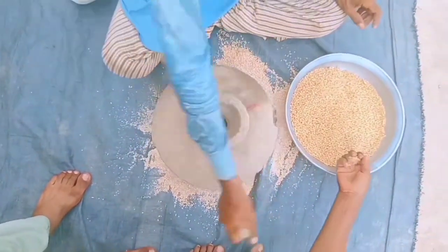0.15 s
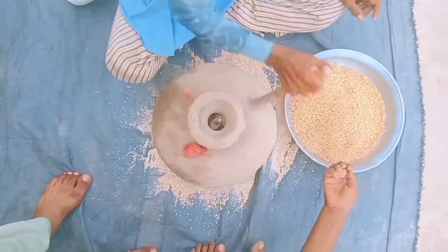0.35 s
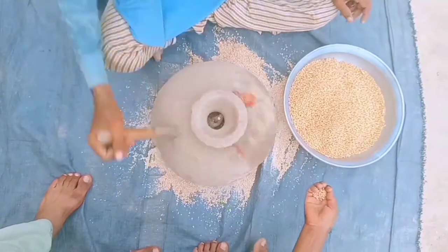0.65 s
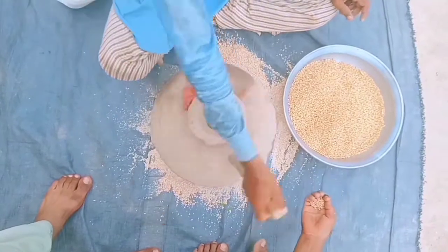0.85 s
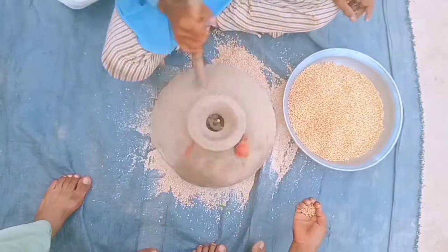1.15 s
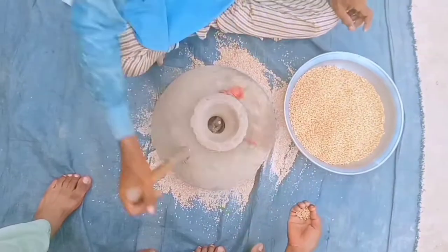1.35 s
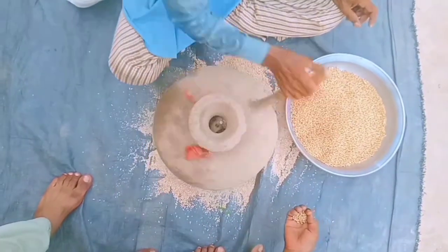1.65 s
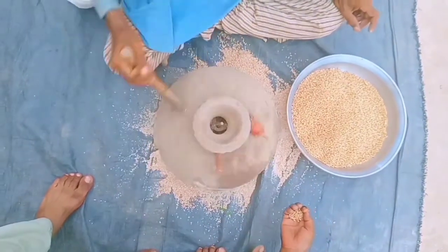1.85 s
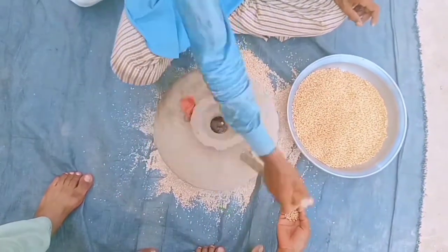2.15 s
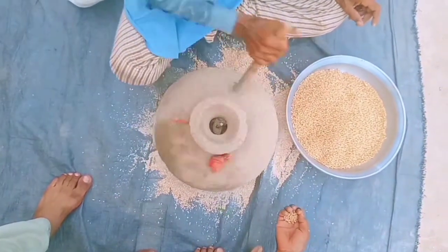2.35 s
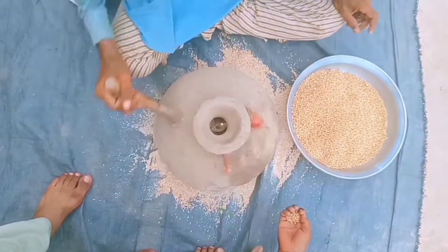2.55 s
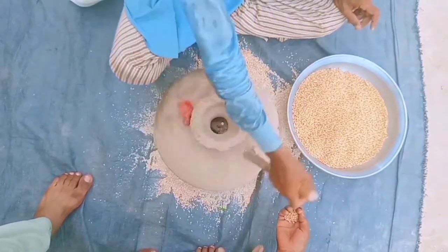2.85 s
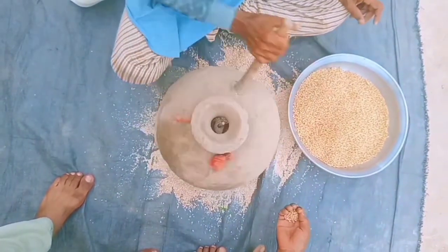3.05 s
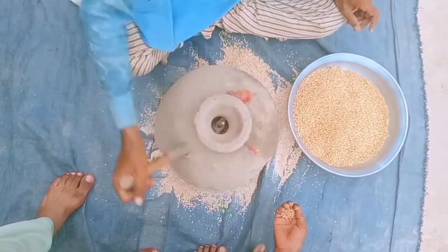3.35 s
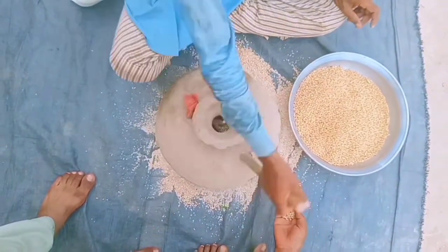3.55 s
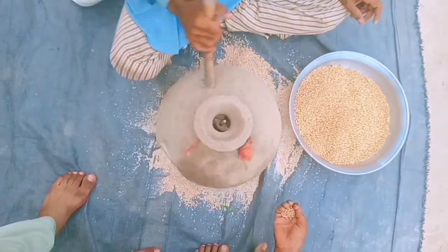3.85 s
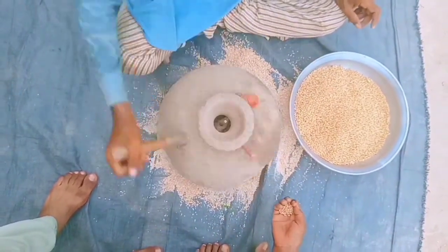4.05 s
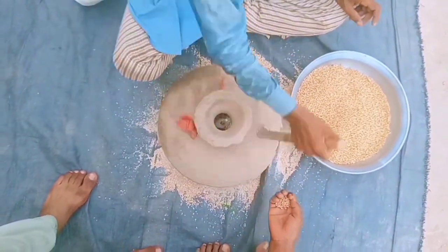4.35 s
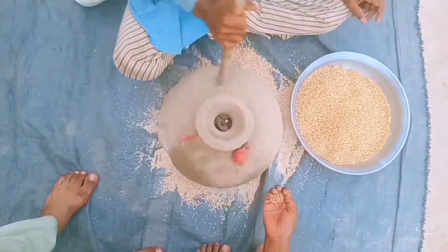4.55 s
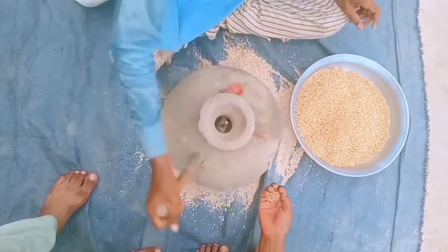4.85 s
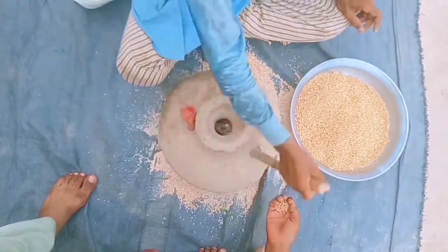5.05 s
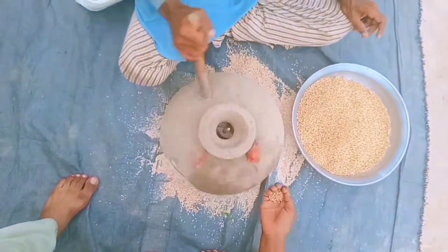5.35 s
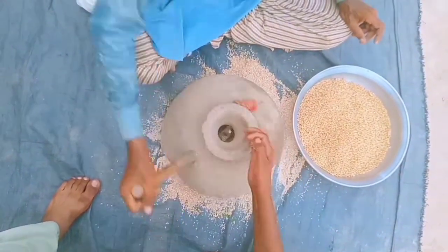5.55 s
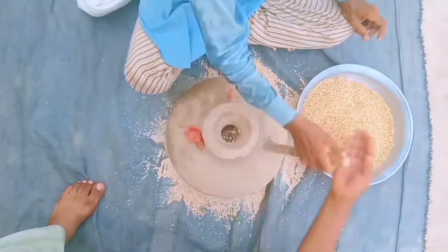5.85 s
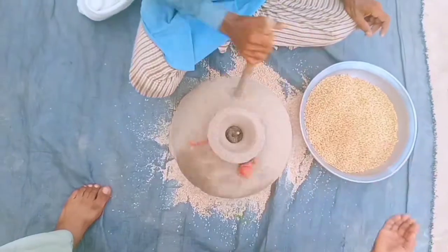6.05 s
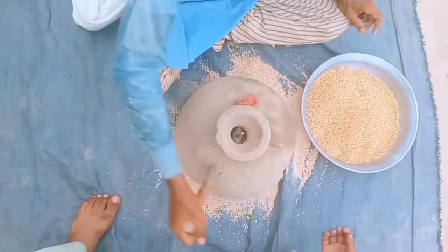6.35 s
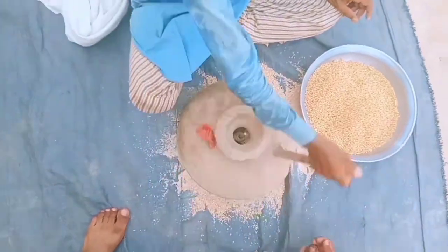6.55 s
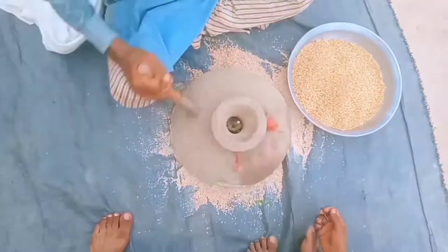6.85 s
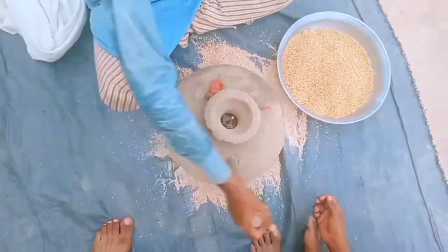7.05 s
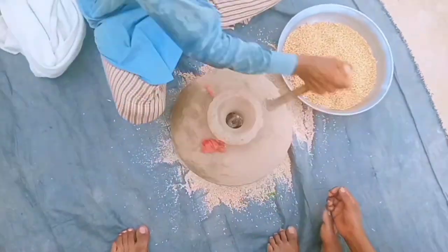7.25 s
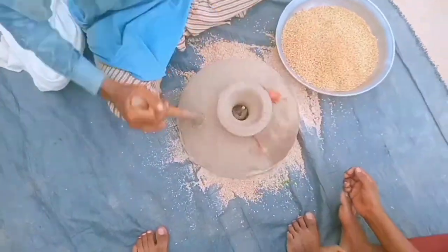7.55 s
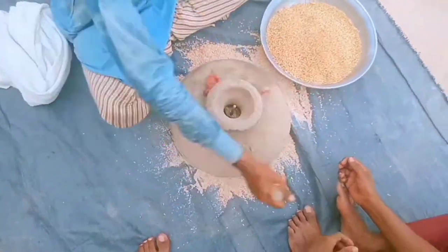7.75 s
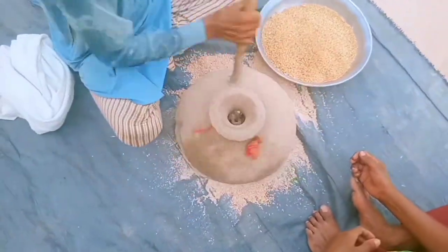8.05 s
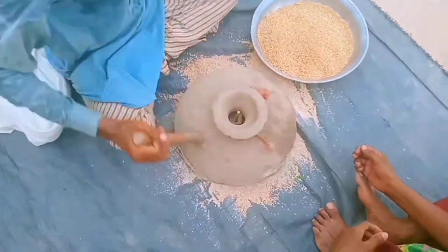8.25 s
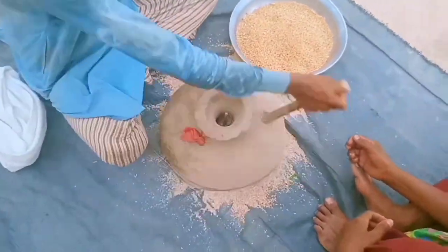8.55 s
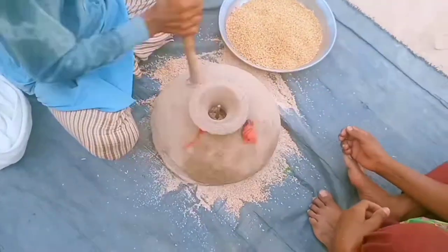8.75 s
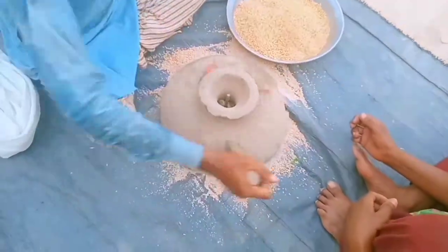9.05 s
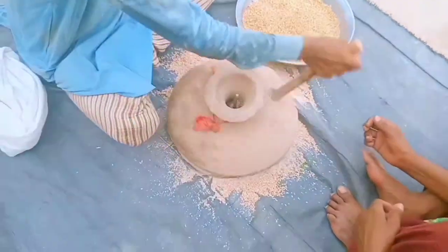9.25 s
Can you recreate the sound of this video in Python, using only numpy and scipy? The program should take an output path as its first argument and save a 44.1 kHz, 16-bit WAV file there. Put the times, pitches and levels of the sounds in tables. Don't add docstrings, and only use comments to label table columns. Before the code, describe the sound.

Steady gritty stone-on-stone grinding with a ringing hum and low rumble, broken by sharp kernel snaps, quick crunchy runs and one tiny squeak.

```python
import sys
import numpy as np
from scipy import signal
from scipy.io import wavfile

SR = 44100
rng = np.random.default_rng(int(sys.argv[2]) if len(sys.argv) > 2 else 0)


def volts_from_db(level):
    exponent = np.asarray(level, float) / 20
    return 10 ** exponent


def generate_wav(sig):
    pcm = np.round(np.clip(np.atleast_2d(sig).T, -1, 1) * 32767).astype(np.int16)
    wavfile.write(sys.argv[1], SR, pcm)


N = 414981

# (time [s], turns made [turns])
TURNS = [(0, 0.01), (2.57, 4.01), (4.0, 6.01), (6.25, 9.01), (8.22, 12.01), (9.41, 13.8)]
# (time [s], level [dB])
PRESSURE = [(0.05, -30.5), (0.68, -30), (1.3, -30.5), (1.74, -31), (2.52, -30.5), (2.99, -33),
            (3.85, -32.5), (5.06, -32), (5.89, -33), (6.52, -33), (7.04, -32.5), (7.29, -31.5), (7.45, -33),
            (8.31, -34), (8.58, -32.5), (9.41, -34)]
# (time [s], level [dB])
ROCKING = [(0.0, -35), (0.76, -39), (1.7, -36), (2.96, -41), (3.85, -39.5), (4.56, -42.5), (5.01, -37),
           (5.5, -42.5), (9.41, -41.5)]
# (time [s], share [0-1])
MEAL_LOAD = [(0, 0.1), (1.5, 0.1), (2.8, .05), (3.6, 0.1), (4.6, 0.1), (5.5, 0.01), (6.5, 0.2), (7.4, 0.3),
             (7.9, 0.6), (8.3, 0.8), (9.41, 1)]
# (time [s], hold [s], change [dB])
JAMS = [
    (3.245, 0.026, -19.5),
    (4.757, 0.12, 15.5),
    (4.954, 0.029, 16.5),
    (5.242, 0.035, 16),
    (5.59, 0.11, 5.5),
    (6.353, 0.063, 7.5),
    (7.698, 0.15, 16),
    (7.97, 0.034, 7.5),
    (8.988, 0.052, -13.5),
]

# (time [s], pitch [Hz])
BODY_HZ = [(0.0, 671), (2.98, 665), (3.69, 640), (4.19, 663), (5.87, 659.5), (6.24, 670), (8.7, 631.5),
           (9.41, 631)]
# (pitch [Hz], width [Hz], level [dB], change under full load [dB])
RUMBLE_MODES = [(91, 44, -3, -1.5), (129, 27.2, 2.5, 1.5), (164.7, 32.7, 1.5, 2), (222.5, 68, -4, 0),
                (384, 360, -8.5, -5), (460, 780, -23, -1)]
SHOULDER_MODES = [(523, 160, -38, 10.5), (817, 92, -26.5, -3.4)]
EDGE_MODES = [(919, 25, -10, 15.5), (1103, 120, -1, -1), (1312, 220, -2, -6.5), (1535, 200, -4.5, -14.5)]
MID_MODES = [(1665, 75.4, -7.5, 6.5), (2118, 51, 1, -2), (2336, 223, -8.5, -2.5)]
HIGH_MODES = [(2937, 250, -7, -1.5), (2992, 56, 4, -4), (3160, 210, -15.5, -3), (3522, 130, -6, 5),
              (4086, 95, -5, 4.5), (4420, 156, -9, -1)]
TOP_MODES = [(4520, 1100, -10, 5), (6160, 300, 3, 0.1), (6780, 330, 0, 0.1), (7300, 270, 1.5, 0.1),
             (8530, 890, -13, 0.1)]
CRACK_MODES = [(1274, 140, -4.5, 12.5), (1417, 250, -6, 7), (1618, 57, -2, -5.5), (2150, 67, 5, -12),
               (2156, 220, -6, -4.5), (2920, 50, -10.5, -4.5), (4300, 540, -23.5, -9.5)]
# (mean [dB], share of pressure swing [ratio], push swing [dB], share of a jam [ratio], wander [dB])
BODY_LEVEL = (-27.5, 1.37, 0.2, 0.49, -0.3)
MID_LEVEL = (-30.5, 1.71, 0.57, 0.08, 0)
HIGH_LEVEL = (-41, 1.47, 0.74, 0.17, 0.58)
FLOUR_LEVEL = (-81.5, 1, 0.7, 0, 2.4)
# (delay [s], level [dB])
GROUND_ECHO = (.042, -9)

# (time [s], peak [dB], share of ring [dB], contact time [ms])
CRACKS = [(0.393, -8, -27, .88), (1.61, -10.5, -29, .72), (1.681, -10.5, -9.5, .44), (1.83, -6.5, -14, .4),
          (2.343, -8.5, -28, .41), (2.511, -15, -19, .74), (2.691, 0, -14.5, .31), (2.72, -2, -23, .35),
          (2.741, 0, -16, .51), (2.763, 1, -29, .31), (2.798, 0.5, -25, .99), (3.713, -11, -9, .99),
          (4.727, 0.5, -21.5, .9), (4.762, 3, -23.5, .83), (4.935, -4, -29, .4), (4.978, 0, -14.5, .55),
          (5.03, -3.5, -33, .39), (5.164, -10.5, -13, .51), (5.201, -4, -12.5, .36),
          (5.228, -1.5, -10.5, .45), (5.268, -16, -6, .55), (5.289, 0, -14, .21), (5.4, -3, -17, .91),
          (5.683, -5.5, -18, .26), (5.846, -4.5, -32, .51), (5.929, 0, -21.5, .69), (7.648, -5.5, -38, .76),
          (7.669, -4.5, -10, .4), (8.606, -9, -32, 0.9)]
# (time [s], peak [dB], share of ring [dB], contact time [ms])
CRUNCHES = [(4.74, 1.5, -22, 0.56), (4.75, -10.5, -27, 0.71), (4.771, -1.5, -20.5, 0.94),
            (4.796, 0, -26, 0.71), (4.815, -13, -29, 0.4), (4.855, -15, -31, 0.63), (4.901, -9, -30, 0.65),
            (4.985, 2, -26, 0.54), (5.046, -4, -21, 0.53), (5.311, -21, -28, 0.61), (5.603, -4.5, -23, 1),
            (5.651, -14, -23, 1), (5.693, -29, -13, 0.58), (5.837, -5, -28, 0.27), (5.861, -9.5, -34, 0.56),
            (6.029, -10.5, -32, 0.75), (7.701, -13, -20, 0.8), (7.711, -3, -21, 0.67),
            (7.736, -4.5, -25, 0.59), (7.753, -3, -26, 1), (7.77, -19, -18, 0.95), (7.818, -3.5, -36, 0.39),
            (4.836, -4.5, -35, 0.44), (4.881, -5, -28, .51), (4.966, -0.5, -28.5, 0.19),
            (5.591, -7.5, -19, 0.32), (7.844, -0.5, -32, 0.38), (7.722, 0.5, -16, 0.83),
            (8.072, -14.5, -18, 0.99)]
# (time [s], peak [dB], length [s])
HUSKS = [(0.114, -61, 0.013), (0.338, -46, 0.0093), (1.378, -56, 0.01), (1.493, -57, 0.012),
         (1.604, -47.5, 0.015), (2.492, -45, 0.011), (3.15, -45, 0.013), (3.301, -51.5, 0.0097),
         (3.316, -45, 0.013), (5.748, -58, 0.013), (6.722, -55.5, 0.012), (6.8084, -61, 0.012),
         (7.197, -59, 0.0096), (7.476, -60, 0.012), (7.718, -51.5, 0.012), (9.046, -57, 0.009),
         (9.062, -44, 0.017), (9.09, -55, 0.012)]
# (time [s], length [s], start pitch [Hz], end pitch [Hz], level [dB])
SQUEAK = (2.503, .032, 5600, 6950, -48)

PUSH_LAG_TURNS = 0.19
ROCK_DB, ROCK_WANDER_DB = 2, 2
JAM_ATTACK_S, JAM_RELEASE_S = 0.013, 0.03
JAM_SAG_HZ_PER_DB, LOAD_SAG_HZ = 0.5, 14
CRACKLE_DB, CRACKLE_PER_S = 2.7, 38
CHIPS, CHIP_DB, CHIP_SPREAD_DB, CHIP_RING_DB, CHIP_MS = 32, -18, 3, -28, 0.7
HUSK_TOP_DB = -27
STONE_CUT_HZ = 4640
OPENING_DB, OPENING_S = -18, 0.00025


def grinding(crackle_db):
    body_db, mid_db, high_db = turning(BODY_LEVEL), turning(MID_LEVEL), turning(HIGH_LEVEL)
    rumble_db = in_time(ROCKING)[0] + ROCK_DB + ROCK_WANDER_DB * drift(6.0)
    rub = grit(per_s=1500, spread_db=2.0, clump_db=1.64, smooth=0.65)

    main_tone = body(rub, half_width_hz=64.0, order=2)
    low = volts_from_db(body_db) * rms_one(main_tone + volts_from_db(7.5) * modes(rub, SHOULDER_MODES, 3.0))

    edge = rms_one(cut(modes(rub, EDGE_MODES, 1.5), [760, 1600], "band"))
    middle = rms_one(cut(modes(rub, MID_MODES, 1.2), [1300, 2600], "band"))
    mid = volts_from_db(mid_db) * (volts_from_db(-7.0) * edge + volts_from_db(-2.5) * middle)

    bright = modes(rub, HIGH_MODES, 1.8, rate=4) + volts_from_db(-27.5) * rub
    ring = volts_from_db(high_db + 0.64 * crackle_db) * rms_one(cut(bright, 2500, "high"))

    shake = rms_one(0.44 * rub + rng.standard_normal(N))
    top = rms_one(cut(modes(shake, TOP_MODES, 0.93), [4600, 8600], "band"))
    ground = rms_one(cut(modes(shake, RUMBLE_MODES, 0.89, rate=11.0), 72, "high", order=4))
    delay_s, echo_db = GROUND_ECHO
    echo = volts_from_db(echo_db) * np.roll(ground, round(delay_s * SR))
    ground = volts_from_db(rumble_db) * (ground + echo)
    return low + mid + ring + ground, volts_from_db(0.48 * high_db - 48.0) * top


def grit(per_s, spread_db, clump_db, smooth):
    sizes = volts_from_db(spread_db * np.minimum(rng.exponential(1, N), 5)) * rng.choice([-1, 1], N)
    born = rng.random(N) < per_s / SR
    rub = rms_one(sizes * born) + smooth * rng.standard_normal(N)
    clumps_db = clump_db * (drift(56.0) + 0.1 * drift(6.8))
    return rms_one(rub * volts_from_db(clumps_db))


def turning(part):
    mean_db, follows, push_db, jammed, wander_db = part
    pressure_db, turns = in_time(PRESSURE)[0], in_time(TURNS)[0]
    pressure_swing_db = pressure_db - pressure_db.mean()
    push = np.cos(4 * np.pi * (turns - PUSH_LAG_TURNS))
    by_hand_db = mean_db + follows * pressure_swing_db + push_db * push
    return by_hand_db + jammed * jams() + wander_db * drift(9.5)


def jams():
    t = np.arange(N) / SR
    total_db = np.zeros(N)
    for s, hold, change_db in JAMS:
        corners = np.cumsum([s - JAM_ATTACK_S, JAM_ATTACK_S, abs(hold), JAM_RELEASE_S])
        total_db += np.interp(t, corners, [0, change_db, change_db, 0])
    return total_db


def body(x, half_width_hz, order):
    hz = in_time(BODY_HZ)[0] - LOAD_SAG_HZ * in_time(MEAL_LOAD)[0] - JAM_SAG_HZ_PER_DB * jams()
    turn = np.exp(2j * np.pi * np.cumsum(hz) / SR)
    near = cut(x / turn, half_width_hz, "low", order=order)
    return 2 * np.real(turn * near)


def modes(x, table, patchy_db=0., rate=8):
    out, load = 0, in_time(MEAL_LOAD)[0]
    for k, (hz, width, level_db, load_db) in enumerate(table):
        r = np.exp(-np.pi * max(width, 10) / SR)
        fed = x * volts_from_db(level_db + load_db * load + patchy_db * drift(rate))
        zeros = (1 - r * r) / 2 * np.array([1, 0, -1])
        poles = [1, -2 * r * np.cos(2 * np.pi * hz / SR), r * r]
        out = out + (-1) ** k * signal.lfilter(zeros, poles, fed)
    return out


def cracks():
    push, snap = blows(CRACKS + chips())
    drag, drag_snap = blows(CRUNCHES)
    thud = volts_from_db(33) * body(push, half_width_hz=70.5, order=2)
    thud = thud + volts_from_db(30) * body(push, half_width_hz=46, order=1)
    thud = thud + volts_from_db(37.0) * body(drag, half_width_hz=56, order=2)
    ring = modes(snap + drag_snap, CRACK_MODES, 3.55, rate=38)
    return cut(thud, 520, "high", order=4) + volts_from_db(41.5) * cut(ring, [880, 3100], "band")


def blows(rows):
    push, snap = np.full(N, 1e-18), np.full(N, 1e-18)
    for s, peak_db, ring_db, contact_ms in rows:
        blow = -signal.windows.hann(int(np.clip(contact_ms, 0.05, 3) * SR / 1000) + 3)
        blow = blow / abs(blow.sum())
        i = round((s - 0.0013) * SR)
        push[i:i + len(blow)] += volts_from_db(peak_db) * blow[:N - i]
        muffled_db = 1.9 * np.interp(s, *np.transpose(MEAL_LOAD))
        snap[i + round(0.0008 * SR)] -= volts_from_db(peak_db + ring_db - muffled_db)
    return push, snap


def chips():
    rows = []
    for when, size, share in rng.random((CHIPS, 3)):
        peak_db = CHIP_DB + CHIP_SPREAD_DB * (2 * size - 1)
        rows.append((0.05 + 9.3 * when, peak_db, CHIP_RING_DB + 8 * (share - 0.5), CHIP_MS))
    return rows


def squeak():
    s, length, from_hz, to_hz, level_db = SQUEAK
    hz = np.linspace(from_hz, to_hz, int(length * SR))
    tone = np.sin(2 * np.pi * np.cumsum(hz) / SR)
    rough = 1 + 3.8 * cut(rng.standard_normal(len(hz)), 560, "low")
    out, i = np.zeros(N), round(s * SR)
    out[i:i + len(hz)] = volts_from_db(level_db) * np.hanning(len(hz)) * rough * tone
    return out


def flour(crackle_db):
    specky = grit(per_s=900, spread_db=3.5, clump_db=0.6, smooth=3.0)
    hiss = cut(specky, 7800, "high", order=4)
    airy = rms_one(hiss + modes(hiss, [(13900, 1500, -1.5, 0.0042)]))
    puffs, age = np.zeros(N), np.arange(1500) / SR
    for s, peak_db, length in HUSKS:
        i = round(s * SR)
        puffs[i:i + 1500] += volts_from_db(peak_db - 11.0) * np.exp(-age / max(length, 0.001))
    husks = cut(puffs * rng.standard_normal(N), 4800, "high", order=4)
    husks = cut(husks, 7000, "low", order=2)
    air_level = volts_from_db(turning(FLOUR_LEVEL) + crackle_db) + volts_from_db(HUSK_TOP_DB) * puffs
    return husks + air_level * airy


def rms_one(x):
    return x / np.sqrt(np.mean(x ** 2) + 1e-20)


def in_time(rows):
    s, *columns = np.transpose(rows)
    return [np.interp(np.arange(N) / SR, s, c) for c in columns]


def drift(rate):
    r = np.exp(-80 * np.pi * rate / SR)
    noise = rng.standard_normal(N // 40 + 2002)
    slow = signal.lfilter([1], [1, -2 * r, r * r], noise)[2000:]
    return np.interp(np.arange(N) / 40, np.arange(len(slow)), rms_one(slow))


def cut(x, hz, kind, order=2):
    return signal.sosfilt(signal.butter(order, hz, kind, fs=SR, output="sos"), x)


def scene():
    crackle_db = CRACKLE_DB * drift(CRACKLE_PER_S)
    stones, top = grinding(crackle_db)
    stones = 1.25 * np.tanh((stones + cracks()) / 1.25)
    dull = cut(stones, STONE_CUT_HZ, "low", order=10)
    bright = volts_from_db(0.7 * crackle_db) * top + flour(0.6 * crackle_db) + squeak()
    return (dull + bright)[None]


def roll_off(x):
    return signal.sosfilt(signal.butter(12, 15500, fs=SR, output="sos"), x)


def record(dry):
    tick = volts_from_db(OPENING_DB) * np.exp(-np.arange(N) / SR / OPENING_S)
    mix = cut(dry, 38, "high") + tick
    return roll_off(mix)


dry = scene()
out = record(dry)
generate_wav(out)
```